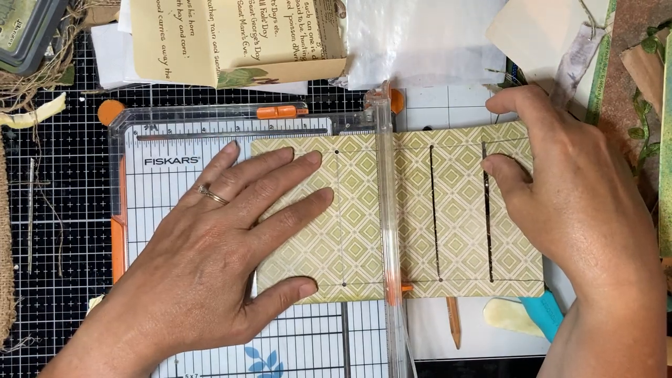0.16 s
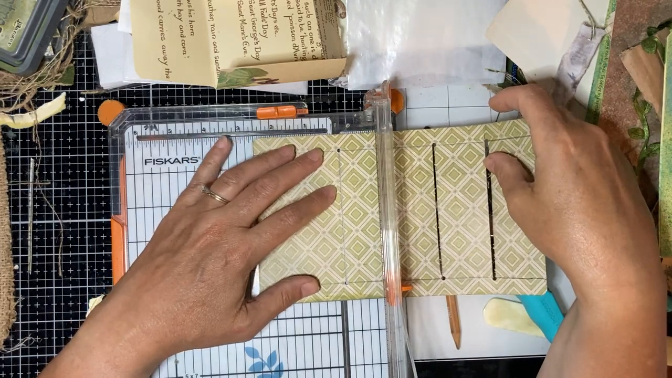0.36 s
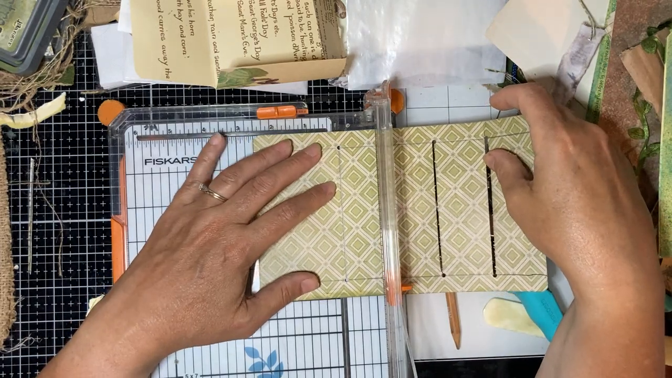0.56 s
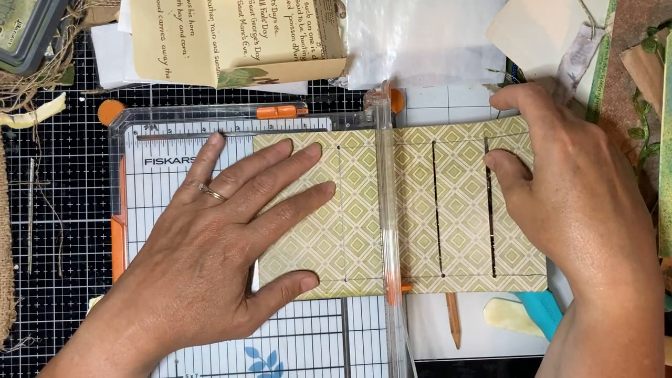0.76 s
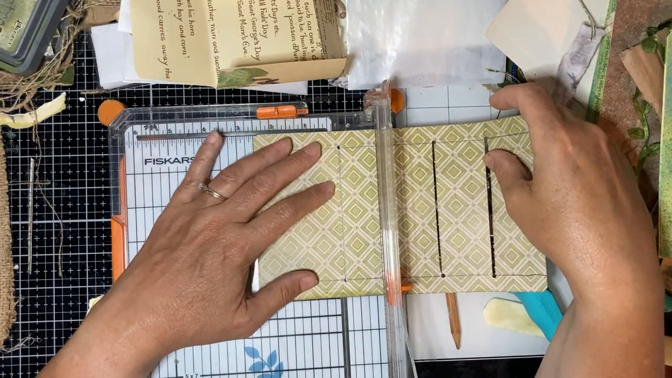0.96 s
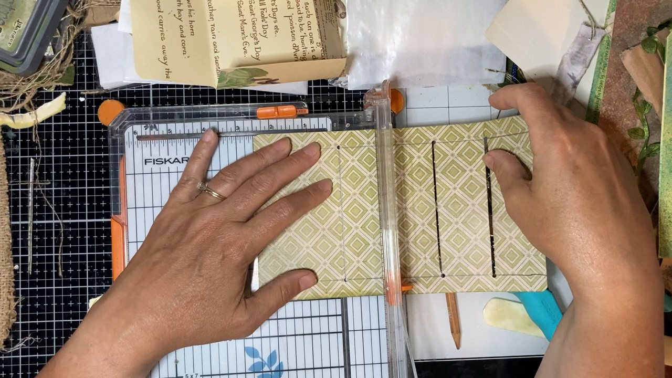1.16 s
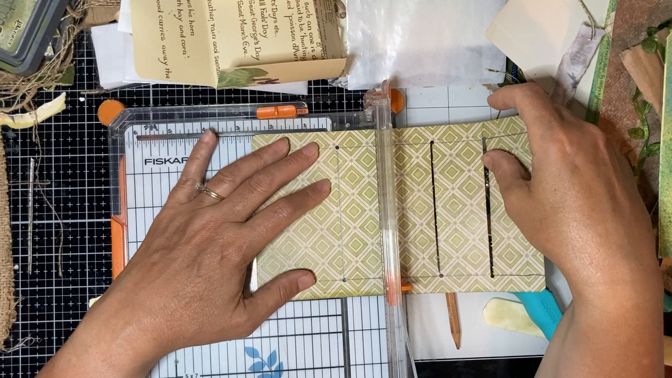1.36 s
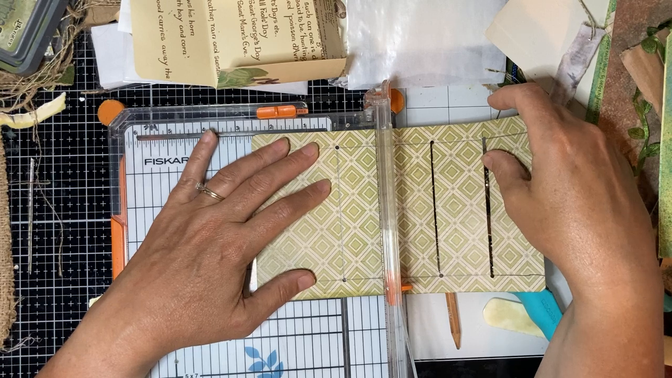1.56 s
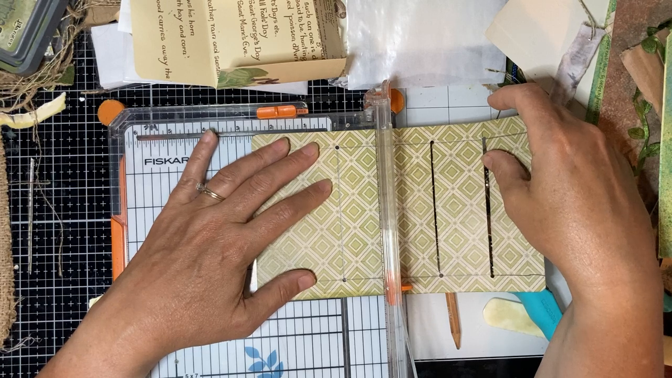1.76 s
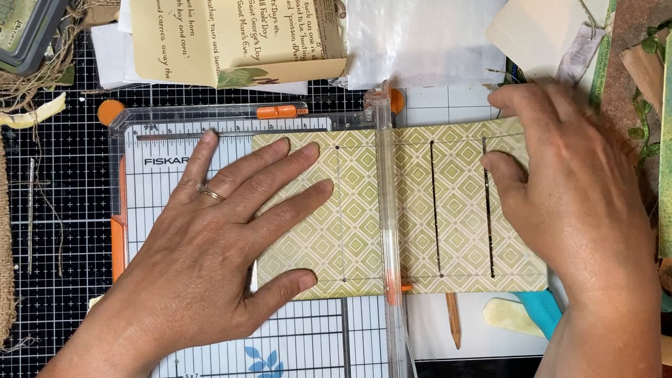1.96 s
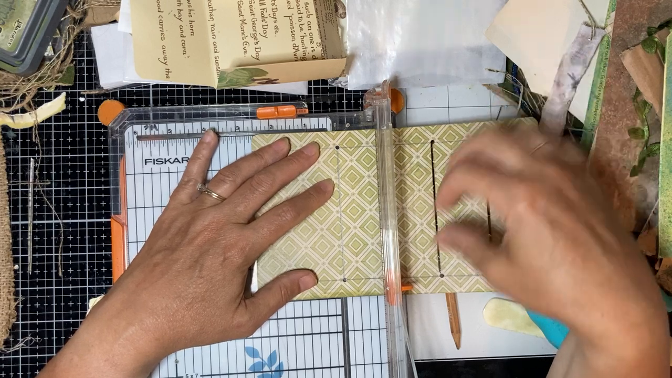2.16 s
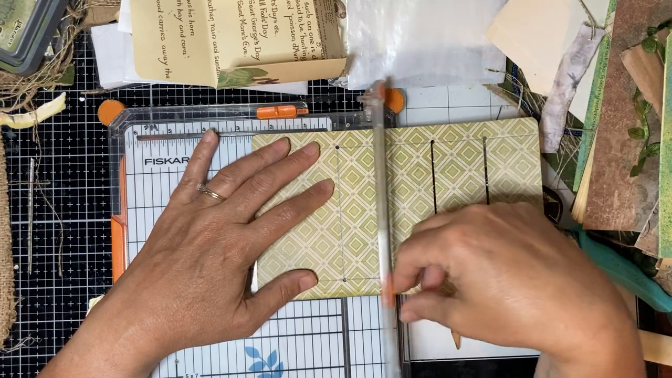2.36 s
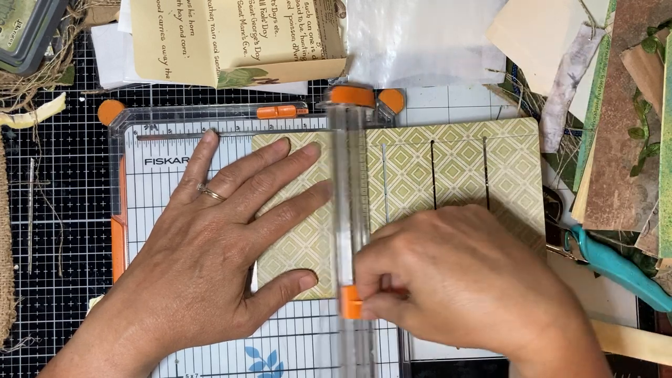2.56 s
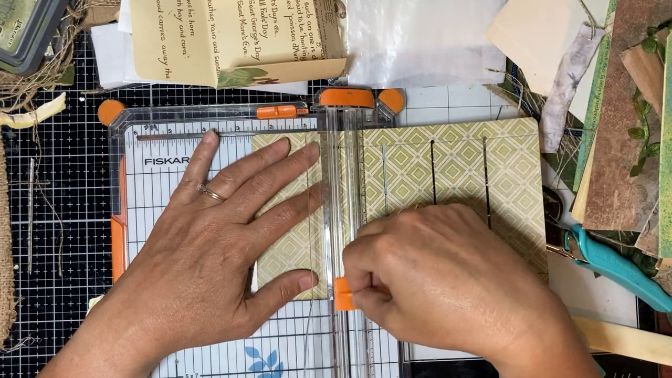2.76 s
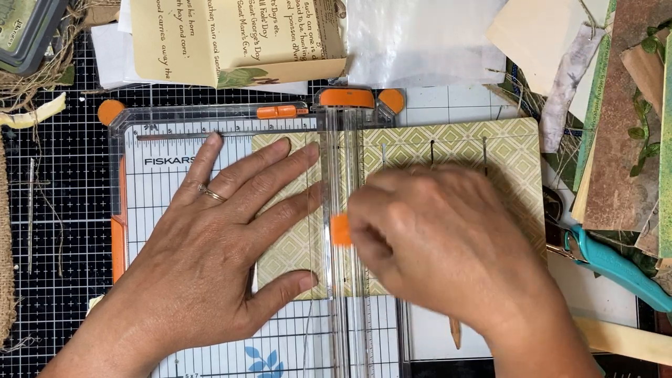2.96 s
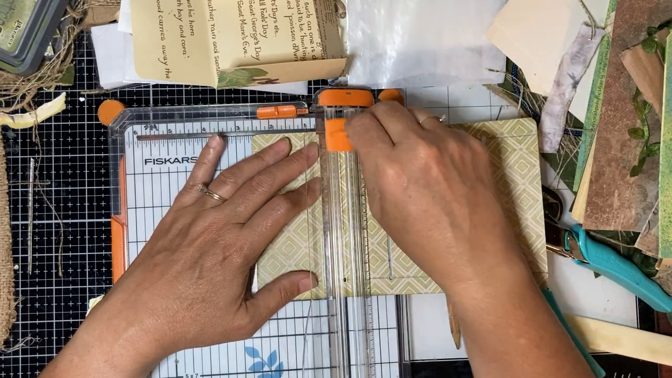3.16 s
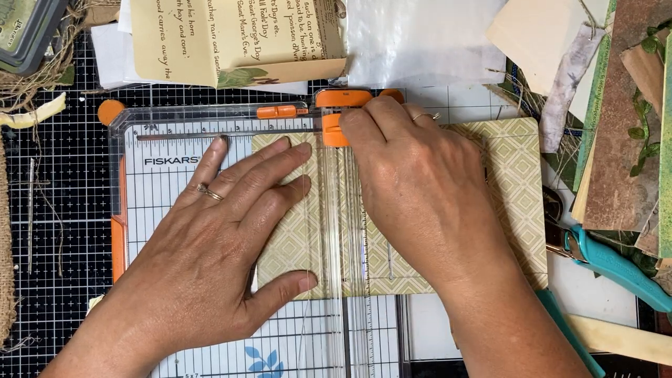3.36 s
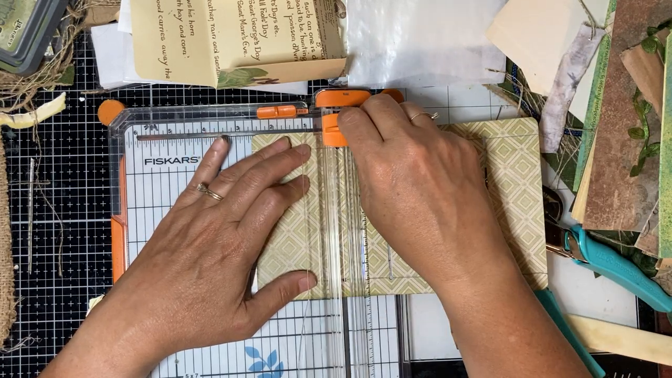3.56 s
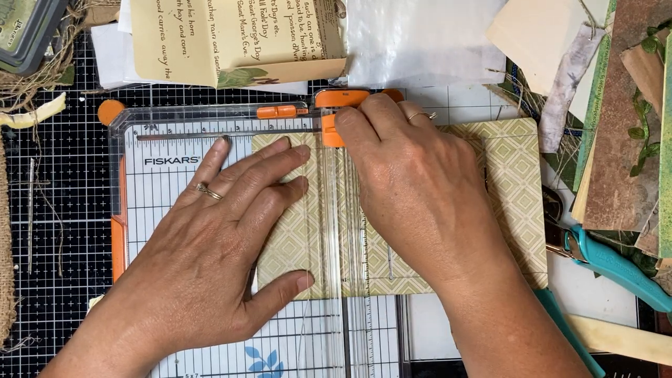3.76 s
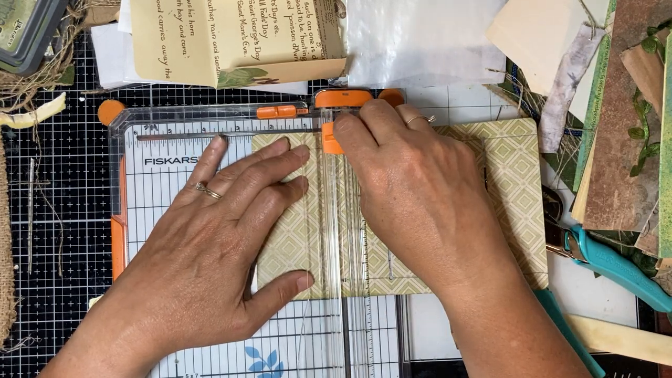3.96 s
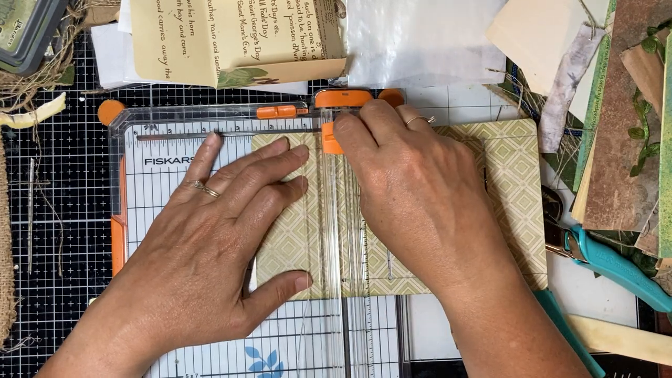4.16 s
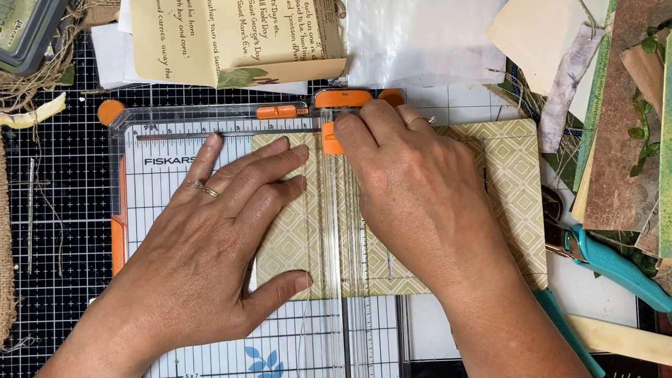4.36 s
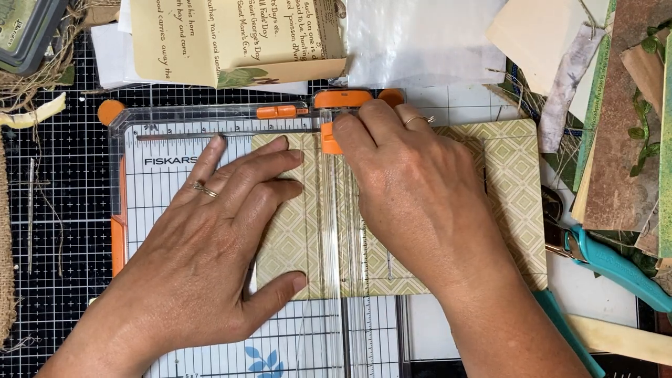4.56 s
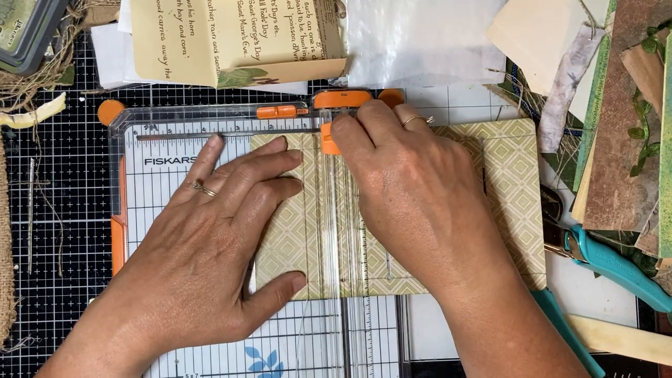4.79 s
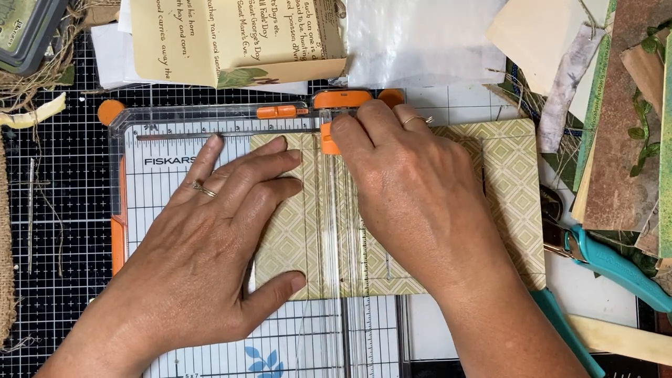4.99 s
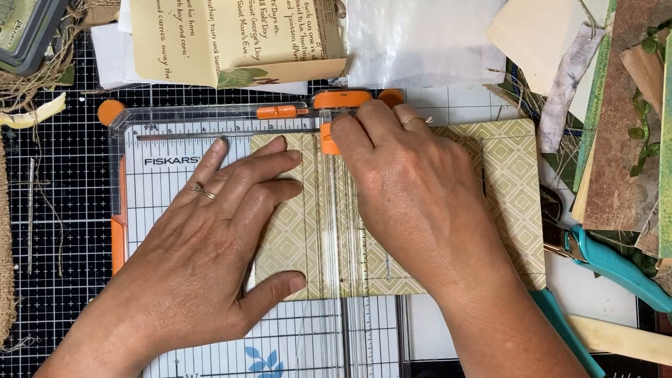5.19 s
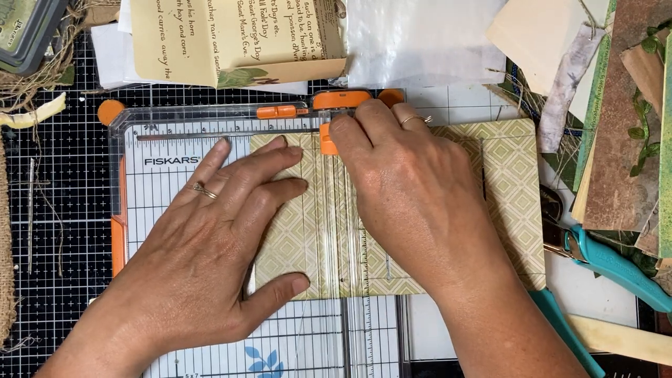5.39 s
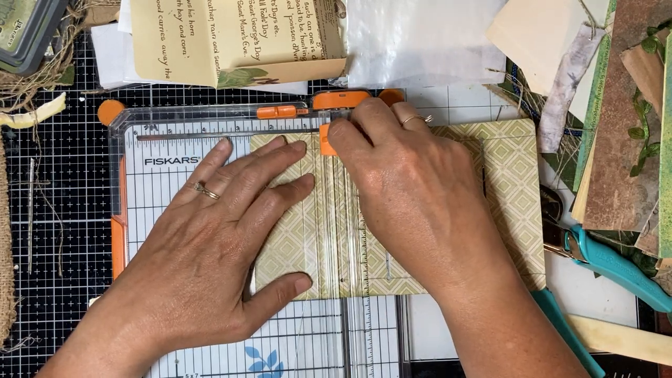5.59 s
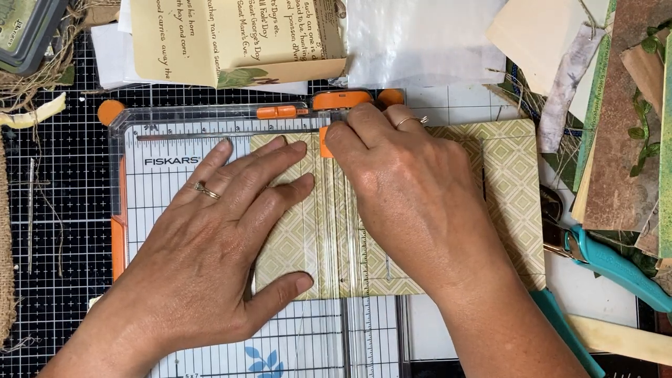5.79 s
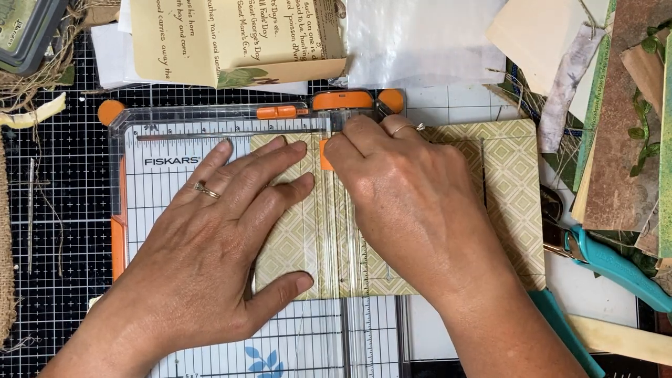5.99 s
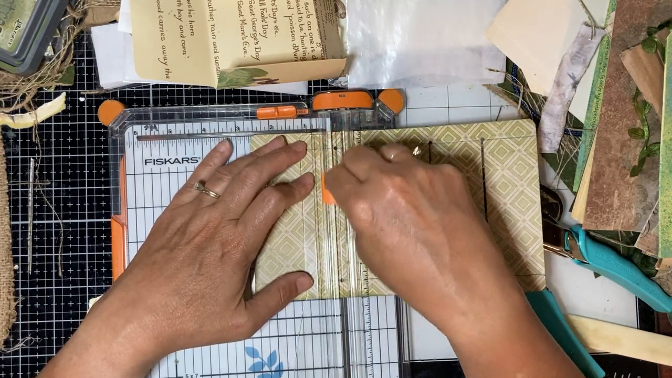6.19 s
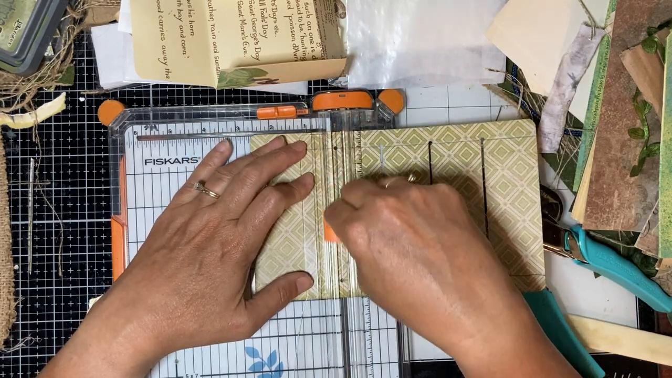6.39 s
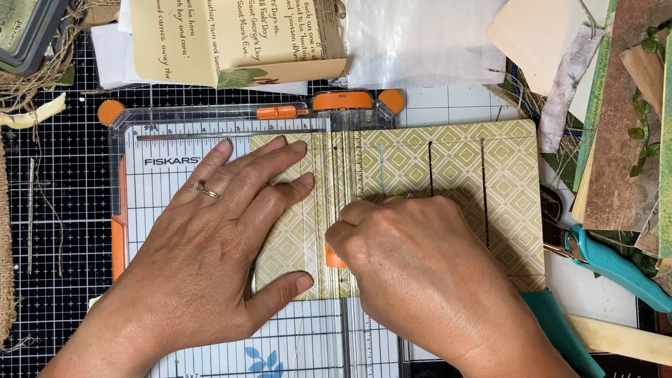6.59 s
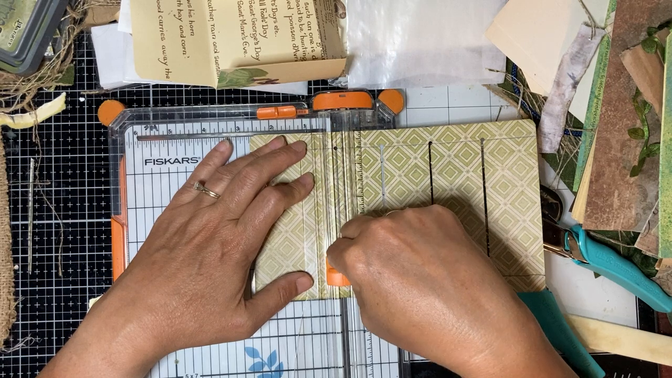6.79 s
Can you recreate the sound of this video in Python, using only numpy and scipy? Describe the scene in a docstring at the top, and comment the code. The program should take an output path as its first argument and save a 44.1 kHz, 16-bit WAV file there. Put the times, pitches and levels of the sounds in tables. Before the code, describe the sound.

In a quiet room, a plastic paper trimmer clacks, squeaks sharply as its carriage slides up, then rasps through card.

```python
"""A small room with a low hum: a plastic paper trimmer on a desk, close under a camera's two microphone ports.
Fingers shift a card in noise swishes, the rail clacks down in noise bursts that ring its modes,
and the blade carriage squeaks in stick-slip tones as it is pushed up the rail.
The blade is pressed in with small knocks, then drawn back through the card in one rasping cut of tiny slips."""
import sys
import numpy as np
from scipy import signal
from scipy.fft import rfft, irfft, next_fast_len
from scipy.io import wavfile
from scipy.ndimage import uniform_filter1d, map_coordinates

SR = 44100
rng = np.random.default_rng(int(sys.argv[2]) if len(sys.argv) > 2 else 0)


def transcribe(signal):
    """Save signal, clipped to [-1, 1], as a 16-bit WAV file at the path in sys.argv[1]."""
    frames = np.atleast_2d(signal).T
    limited = np.clip(frames, -1, 1)
    pcm = np.round(limited * 32767).astype(np.int16)
    wavfile.write(sys.argv[1], SR, pcm)


N = 301644
TIME = np.arange(N) / SR  # s
SIZE = 2 * next_fast_len(N // 2 + SR // 4)  # padded transform length, samples
HZ = np.fft.rfftfreq(SIZE, 1 / SR)
TOP_HZ = 15830  # the camera's band limit


def amp(db):
    """Decibels to gain."""
    return 10 ** (np.asarray(db) / 20)


def unit(x):
    """Scale to rms 1."""
    return x / np.sqrt(np.mean(x ** 2) + 1e-20)


def along(points, hz=HZ):
    """(Hz, value) points read on a log frequency axis."""
    f, v = np.transpose(points)
    return np.interp(np.log(hz + 1), np.log(f + 1), v)


def curves(rows):
    """A gate that opens at the first row and closes just after the last, then each column per sample."""
    s, *columns = np.transpose(rows)
    opening = np.clip((TIME - s[0]) / 0.0047, 0, 1)
    closing = np.clip((s[-1] - TIME) / 0.034 + 2, 0, 1)
    return [opening * closing] + [np.interp(TIME, s, column) for column in columns]


def wobble(rate):
    """A smooth random curve, rate knots a second."""
    knots = rng.standard_normal(int(N * rate / SR) + 4)
    return map_coordinates(knots, [TIME * rate])


def filtered(x, response):
    """x through a frequency response."""
    return irfft(rfft(x, SIZE) * response, SIZE)[..., :N]


def causal(gain):
    """The minimum-phase response with this gain, by folding the cepstrum."""
    cepstrum = irfft(np.log(np.maximum(gain, 1e-6)))
    cepstrum[1:SIZE // 2] *= 2
    cepstrum[SIZE // 2 + 1:] = 0
    return np.exp(rfft(cepstrum))


def band(x, hz, octaves):
    """One band of x around hz, rms 1."""
    edge = 2 ** (octaves / 2)
    limits = [hz / edge, min(hz * edge, TOP_HZ)]
    return unit(signal.sosfilt(signal.butter(2, limits, "bandpass", fs=SR, output="sos"), x))


def grains(rate, spread_db):
    """Tiny slips and fibre snaps of uneven size, rate a second on average, rms 1."""
    moments = rng.random(N) < rate / SR
    sizes = rng.standard_normal(N) * amp(spread_db * rng.standard_normal(N))
    return unit(moments * sizes)


def patchy(x, depth_db):
    """The colour drifts in narrow patches as the points of contact change."""
    z = signal.stft(x, nperseg=512)[2]
    field = uniform_filter1d(rng.standard_normal(z.shape), size=3, axis=0)
    field = uniform_filter1d(field, size=16, axis=1)
    return signal.istft(z * unit(amp(depth_db * unit(field))), nperseg=512)[1][:N]


SWELL_DB, SWELL_SHAPE = 19.5, 1.57  # fall at the ends of the rise and fall; roundness of the top


def swell(s, rise, fall):
    """Level in dB of a movement that gathers, peaks at s and eases off."""
    distance = np.maximum((s - TIME) / rise, (TIME - s) / fall)
    return -SWELL_DB * np.clip(distance, 0, 10) ** SWELL_SHAPE


def struck(s, attack, t60):
    """Gain of something struck at s: a quick rise and a steady decay."""
    age = np.maximum(TIME - s, 0)
    return (1 - np.exp(-age / attack)) * amp(-60 * np.minimum(age / t60, 4))


TOP_DB, TOP_GROWS = -6, 0.32  # treble under the middle register; dB more per dB of brightness


def shades(db, bright_db):
    """Low, middle and high levels: a brighter touch has less knock and more treble."""
    return db - bright_db, db, db + TOP_DB + TOP_GROWS * bright_db


# the two microphone ports, lead of the left over the right: f/Hz, phase/rad
PORT_LEAD = [(100, 0), (700, .9), (1500, 0), (3100, 1.4), (4500, 1.9), (5500, 2.6), (6800, .1),
             (9100, -3.14), (11300, -6.28), (13500, -9.42), (15600, -12.5)]
# left minus right at the ports: f/Hz, level/dB
PORT_TILT = [(100, -0.5), (300, 0), (550, 3), (1000, 3.5), (2000, 1), (4000, 2), (12000, -1)]


def ports():
    """Left and right responses to a sound from the desk: opposite halves of the level and phase gap."""
    half = amp(along(PORT_TILT) / 2) * np.exp(.5j * along(PORT_LEAD))
    return np.array([half, 1 / half])


# ringing of trimmer base and rail over the broad response:
# f/Hz, width/Hz, level/dB with the carriage at the far end, level/dB at the near end
TRIMMER_MODES = [(345.5, 40.9, 6.5, 5.5), (582, 170, 9.5, 15.5), (678, 70, 10.5, -3.5),
                 (790, 130, 4.5, 1.5), (1120, 60, 11, 4), (1215, 130, -4.5, 13), (1550, 110, 9.5, -0.5),
                 (1740, 120, -9, 15), (1979, 210, 8.5, 15), (2252, 110, 6, 2.5), (2730, 220, 3, 6.5),
                 (3445, 220, 1.5, 5.5), (4200, 220, -4, 5.5), (4770, 260, 2, 4)]
# edges between the low, middle and high registers: f/Hz
REGISTER_EDGES = (1000, 6000)


def registers(spectrum, nearness, coupling=1):
    """Low, middle and high stereo responses, each of unit power; coupling is how strongly the trimmer rings."""
    peaks = 0
    for hz, width, far_db, near_db in TRIMMER_MODES:
        peak_db = far_db + nearness * (near_db - far_db)
        peaks = peaks + peak_db / (1 + (2 * (HZ - hz) / width) ** 2)
    body = amp(along(spectrum) + coupling * peaks)
    low, below_top = (1 / (1 + (HZ / hz) ** 12) for hz in REGISTER_EDGES)
    shares = (low, (1 - low) * below_top, 1 - below_top)
    pair = ports()
    parts = [causal(body * np.sqrt(share)) * pair for share in shares]
    return [part / np.sqrt(np.mean(np.abs(part.mean(0)) ** 2)) for part in parts]


# likeness of steady noise at the two ports: f/Hz, likeness/-1 to 1
PORT_LIKENESS = [(60, 0.93), (130, 0.9), (290, 0.74), (640, 0.35), (1400, .15), (6200, .1), (8400, .8),
                 (15000, .85)]


def rush(spectrum):
    """Steady stereo noise, more or less alike at the ports by frequency, rms 1."""
    turn = np.arccos(np.clip(along(PORT_LIKENESS), -1, 1)) / 2
    mix = np.array([np.cos(turn), np.sin(turn)])
    mid, side = filtered(rng.standard_normal((2, N)), amp(along(spectrum)) * mix)
    return unit(np.array([mid + side, mid - side]))


# low rumble, relative spectrum: f/Hz, level/dB
RUMBLE = [(12, -69.5), (20, -32.5), (38, -14.5), (60, 0), (71, -17.5), (81, -8), (109, -7.5), (201, -22),
          (239, -17.5), (264, -27.5), (400, -35), (520, -68), (880, -120)]
# faint hiss, relative spectrum: f/Hz, level/dB
HISS = [(150, -2), (300, -8.5), (600, -0.5), (1000, -6.5), (2000, -13.5), (4000, -17.5), (8000, -17.5),
        (13000, -19.5), (15000, -27), (16000, -36.5)]
# hum tones, mean level before a slight waver: f/Hz, level/dB
HUM_TONES = [(59, -54.5), (102.3, -68), (120, -68.5)]
# a faint 335 Hz tone dying away: t/s, level/dB
FADING_DRONE = [(0, -75.5), (0.9, -71), (1.25, -76.5), (1.5, -98), (1.7, -120)]


def background():
    """Low rumble, a wavering hum of sines, a fading drone and faint steady hiss."""
    hum = 0
    for hz, db in HUM_TONES:
        tone = unit(np.sin(2 * np.pi * hz * TIME + 0.6 * wobble(3.9)))
        hum = hum + amp(db + 0.5 * wobble(8.5)) * tone
    gate, drone_db = curves(FADING_DRONE)
    drone = gate * amp(drone_db) * np.sin(2 * np.pi * 335 * TIME + 0.3 * wobble(6.7))
    rumble = amp(-56.5) * rush(RUMBLE)
    hiss = amp(-79.0) * filtered(rush(HISS), ports())
    return hum + drone + rumble + hiss


# decay of the room: f/Hz, t60/s
ROOM_DECAY = [(150, 0.21), (1000, 0.26), (5000, 0.22), (14000, 0.08)]


def room(x):
    """A short diffuse answer from the desk and walls: decaying noise, different at each port."""
    hz, t, z = signal.stft(rng.standard_normal((2, SR // 2)), SR, nperseg=256)
    decay = amp(-60 * t / along(ROOM_DECAY, hz)[:, None])
    tail = signal.istft(z * decay, SR, nperseg=256)[1]
    tail = np.pad(tail / np.linalg.norm(tail[0]), ((0, 0), (SR // 250, 0)))  # starts 4 ms late
    return signal.fftconvolve(x, tail, axes=1)[:, :N]


def clutter(x):
    """Things on the desk scatter the middle frequencies back within milliseconds, differently to each port."""
    t = np.arange(SR // 40) / SR
    copies = rng.standard_normal((2, len(t))) * t * np.exp(-t / 0.0013)
    response = rfft(copies / np.linalg.norm(copies[0]), SIZE)
    around_3_khz = np.exp(-np.log((HZ + 1) / 3000) ** 2)
    return filtered(x, response * around_3_khz)


# part of a sliding sound that arrives scattered: f/Hz, share/0-1
SCATTERED_SHARE = [(200, .03), (600, .1), (1000, .22), (1800, .18), (2600, .5), (4000, .5), (5800, .68),
                   (7000, .25), (9000, .06), (12000, .12)]


def scattered(x):
    """Moving hands and card scatter part of a sliding sound along ever-changing paths to each port."""
    share = np.clip(along(SCATTERED_SHARE), 0, 1)
    z = signal.stft(filtered(x, np.sqrt(share)), nperseg=128)[2]
    real, imag = uniform_filter1d(rng.standard_normal((2, *z.shape)), size=16, axis=-1)
    turned = z * np.exp(1j * np.arctan2(imag, real))  # slowly changing random phase
    paths = signal.istft(turned, nperseg=128)[1][:, :N]
    return filtered(x, np.sqrt(1 - share)) + np.sqrt(2) * paths


# broad response to the sliding carriage, shared by fingers and blade catches: f/Hz, level/dB per Hz
SLIDE_RESPONSE = [(60, -3), (200, 1.5), (420, -1.5), (800, -8.5), (1400, -12.5), (2600, -14.5), (3800, -11),
                  (4600, -12), (6000, -15), (8500, -14), (11000, -13.5), (13500, -18.5), (16000, -23.5)]


def fidgets():
    """The resting fingers keep making faint, dull shuffles on the card: grains in slow random swells."""
    shuffle = amp(5 * np.minimum(wobble(22), 2) - 85) * grains(3000, spread_db=2)
    low, middle, _ = registers(SLIDE_RESPONSE, 0, coupling=0.35)
    return filtered(shuffle, low + amp(-4.5) * middle)


# broad response of the rubbed card: f/Hz, level/dB per Hz
CARD_RESPONSE = [(150, 16), (1200, -9), (1800, 0.5), (2700, -10), (5000, -6), (7000, -8), (10000, -4),
                 (13000, -3.5), (16000, -13.5)]
# fingers and card rubbing: t/s at the loudest, rise/s, rasp level/dB, hiss level/dB
CARD_RUBS = [(0.454, 0.079, -77, -71.5), (0.614, 0.026, -99, -70), (0.85, 0.04, -99, -76.5),
             (0.969, 0.059, -99, -74.5), (1.039, 0.014, -81, -75.5), (1.996, 0.054, -58.5, -58),
             (2.133, 0.0067, -99, -74.5), (4.108, 0.051, -77, -90.5), (4.449, 0.062, -71.5, -73.5),
             (5.248, 0.04, -66, -61)]
RUB_FALL = .8  # fall time over rise time


def rubs():
    """Skin and card slide in short dry swishes that also stir the trimmer's base."""
    rasp, hiss = 0, 0
    for s, rise, rasp_db, hiss_db in CARD_RUBS:
        shape = amp(swell(s, rise, RUB_FALL * rise))
        rasp = rasp + amp(rasp_db) * shape
        hiss = hiss + amp(hiss_db) * shape
    out = 0
    for gain, response in zip((amp(-6.0) * rasp, rasp, hiss), registers(CARD_RESPONSE, 0.39, coupling=0.1)):
        grit = patchy(grains(2000, spread_db=3.5), depth_db=5.5)
        out = out + filtered(gain * grit, response)
    return out


# brief scuffs of fingers, card and carriage: t/s at the loudest, rise and fall/s, centre f/Hz, level/dB
COLOURED_SCUFFS = [(0.992, 0.054, 880, -75), (1.57, 0.022, 950, -77), (2.007, 0.027, 1970, -51.5),
                   (2.878, 0.014, 1180, -57.5), (3.04, 0.02, 1180, -58), (3.093, 0.0139, 1015, -55.5),
                   (3.114, .025, 663, -59), (3.15, .017, 1980, -55), (4.1, 0.073, 660, -68.5),
                   (5.705, 0.04, 1990, -65.5), (5.845, 0.031, 1950, -60), (6.075, 0.066, 1760, -54)]


def scuffs():
    """Each scuff is a swell of grit in one band, set by where it touches."""
    grit = grains(3200, spread_db=-2.0)
    out = 0
    for s, span, hz, db in COLOURED_SCUFFS:
        out = out + band(grit, hz, octaves=.8) * amp(db + swell(s, span, span))
    return filtered(out, ports())


# the trimmer's base rocking against the desk under the hand: t/s, level/dB
BASE_KNOCKS = [(2.133, -50.5), (3.914, -57.5), (4.152, -60), (4.192, -57), (5.228, -41.5), (5.286, -37.5),
               (5.303, -47.5)]
# what the base rings with, relative to the knock: f/Hz, level/dB, t60/s
BASE_RINGS = [(404, -9, .055), (470, -3, .055), (680, 0, .06), (850, -10, .04)]


def rocking():
    """The base knocks softly on the desk: a short, dull, hollow thud of decaying sines."""
    rings = 0
    for s, db in BASE_KNOCKS:
        for hz, mode_db, t60 in BASE_RINGS:
            tone = np.sin(2 * np.pi * hz * TIME + .5 * wobble(150))
            rings = rings + amp(db + mode_db) * struck(s, .005, t60) * tone
    return filtered(rings, ports())


# the desk giving under the harder pushes: t/s, f/Hz, level/dB
DESK_THUMPS = [(2.634, 118.5, -35), (5.242, 143, -47), (5.871, 320, -38), (5.872, 157, -37.5),
               (6.787, 111, -36)]


def thumps():
    """A few low cycles of the desk top: decaying sines."""
    out = 0
    for s, hz, db in DESK_THUMPS:
        out = out + amp(db) * struck(s, 0.002, 0.09) * np.sin(2 * np.pi * hz * (TIME - s))
    return out


# sharp ticks of a card edge or the blade: t/s, centre f/Hz, level/dB
EDGE_TICKS = [(1.039, 1600, -63.5), (2.011, 4700, -52), (2.027, 7000, -52), (2.13, 1270, -59.5),
              (3.089, 1007, -48), (3.142, 1970, -44), (5.254, 5150, -51.5), (5.532, 4300, -47),
              (5.704, 3650, -56.5), (5.72, 3620, -58), (5.869, 1630, -40.5)]
CONTACT_ATTACK_S = .0009  # ticks and clacks alike


def ticks():
    """Each tick is a sudden burst of noise in one band that dies within milliseconds."""
    noise = rng.standard_normal(N)
    out = 0
    for s, hz, db in EDGE_TICKS:
        out = out + amp(db) * struck(s, CONTACT_ATTACK_S, t60=.024) * band(noise, hz, octaves=.9)
    return filtered(out, ports())


def strikes(blows, responses, lives):
    """Each blow (s, low, middle, high dB) is a sharp crack and a short rattle; lives are the rattles' t60 in s."""
    t = np.arange(SR // 5) / SR
    out = 0
    for column, (response, t60) in enumerate(zip(responses, lives)):
        force = np.zeros(N + SR)
        rattle, crack = amp(-60 * t / t60), 0.78 * amp(-60 * t / 0.0026)
        shape = (rattle + crack) * (1 - np.exp(-t / CONTACT_ATTACK_S))
        for s, *levels_db in blows:
            burst = shape * rng.standard_normal(len(t))
            burst *= np.sqrt(0.0066 * SR) / np.linalg.norm(burst)  # the energy of 6.6 ms at rms 1
            force[round(s * SR):][:len(t)] += amp(levels_db[column]) * burst
        out = out + filtered(force[:N], response)
    return out


# broad response to a blow: f/Hz, level/dB per Hz
BLOW_RESPONSE = [(60, -7.5), (200, 7), (400, -2.5), (950, -3), (1400, -7), (2600, -10.5), (3400, -7),
                 (4300, -4), (6000, -13.5), (8500, -10.5), (11000, -14), (16000, -22.5)]
# plastic parts touching: t/s, clack level/dB, brightness/dB of the clack over the low knock
PLASTIC_CONTACTS = [(0.902, -66, -13.5), (1.874, -84, -19.5), (1.991, -53.5, 10), (2.01, -59, -3.5),
                    (2.13, -80, -25.5), (2.343, -63, -12), (2.428, -69.5, -13), (2.509, -53, 8),
                    (2.534, -57.5, 12.5), (2.563, -68, 17), (2.625, -62.5, 9), (2.635, -53.5, 25.5),
                    (2.635, -39.5, 2.5), (2.651, -40.5, 5.5), (2.665, -54, 14), (2.69, -58.5, 5.5),
                    (2.703, -55, 22), (2.767, -66, -5.5), (3.165, -58, 13), (3.252, -66.5, -7.5),
                    (3.314, -56, 0), (3.331, -56, -4.5), (3.604, -67.5, -5), (4.019, -76.5, 31),
                    (4.415, -64.5, -13), (5.226, -67, -17), (5.252, -58, -6.5), (5.532, -66, 18),
                    (5.682, -65.5, 12), (5.775, -64.5, -11.5), (5.868, -68.5, -9)]


def contacts():
    """Plastic parts clack together and ring the rail; the highs die first."""
    blows = [(s, *shades(db, bright_db)) for s, db, bright_db in PLASTIC_CONTACTS]
    return strikes(blows, registers(BLOW_RESPONSE, 0.08, coupling=0.67), lives=(.08, .045, .025))


# the blade catching in the card late in the cut: t/s, clack level/dB
BLADE_CATCHES = [(6.412, -44), (6.456, -49), (6.475, -46.5), (6.49, -47), (6.512, -43.5), (6.558, -45.5),
                 (6.593, -44.5), (6.645, -46), (6.73, -54), (6.779, -45)]
CATCH_KNOCK_DB, CATCH_TICK_DB = -4, -12  # relative to the clack


def catches():
    """The blade catches and snaps free, ringing the near end of the rail."""
    blows = [(s, db + CATCH_KNOCK_DB, db, db + CATCH_TICK_DB) for s, db in BLADE_CATCHES]
    return strikes(blows, registers(SLIDE_RESPONSE, 1.0, coupling=1.0), lives=(.06, .02, .016))


# the carriage gripped, jolted and pressed in: start t/s, length/s, rasp level/dB, brightness/dB
SHORT_SCRAPES = [(2.353, 0.039, -74.5, -13.5), (2.434, 0.11, -69.5, -2.5), (2.868, 0.065, -74, 5),
                 (3.134, 0.012, -60, 3), (3.246, 0.033, -67.5, -5.5), (3.32, 0.026, -63, -4),
                 (5.482, 0.082, -73, -2.5), (5.583, 0.07, -76.5, -6), (5.674, 0.074, -67, -1.5),
                 (5.79, 0.034, -75, 7)]
SCRAPE_ATTACK_S, SCRAPE_T60_S = .007, .12


def scrapes():
    """Gains of body, rasp and hiss for the short scrapes: a quick attack, a hold and a release."""
    gains = 0
    for s, length, db, bright_db in SHORT_SCRAPES:
        attack = np.clip((TIME - s) / SCRAPE_ATTACK_S, 0, 1)
        release = amp(-60 * np.maximum(TIME - s - length, 0) / SCRAPE_T60_S)
        gains = gains + np.outer(amp(shades(db, bright_db)), attack * release)
    return gains


def driven(effort_db, law):
    """Gains of body, rasp and hiss, each growing with effort at its own rate."""
    return np.array([amp(db + grows * effort_db) for db, grows in law])


# carriage on the rail: t/s, place/0 far end - 1 near end
CARRIAGE_PLACE = [(2.7, 0.5), (3.2, 0.11), (5.95, 0.05), (6.1, .2), (6.3, 0.3), (6.47, 0.98), (6.75, 0.92)]
# one row each for body, rasp and hiss: slips/per s, share of the judder/ratio, patchiness/dB
STROKE_GRAIN = [(3000, 1.3, 1), (4500, .7, 1.1), (5000, .7, 2.2)]


def stroke(gains, ends, judder_db, snag_db):
    """The carriage drags in uneven slips and snags; its place on the rail shifts the modes and an echo."""
    nearness = np.clip(curves(CARRIAGE_PLACE)[1], 0, 1)
    snags = (wobble(260) > 2) * snag_db  # rare catches of a few milliseconds
    judder = judder_db * (wobble(110) + .5 * wobble(35)) + snags
    echo_s = .0021 - 0.0011 * nearness
    out = 0
    for far, near, gain, (rate, share, patch_db) in zip(*ends, gains, STROKE_GRAIN):
        slips = patchy(grains(rate, spread_db=-1), patch_db) * amp(share * judder)
        echo = np.interp(TIME - echo_s, TIME, slips)
        slips = unit(slips + 0.19 * echo) * gain
        out = out + filtered(slips * (1 - nearness), far) + filtered(slips * nearness, near)
    return out


# how hard the blade is drawn through the card, counted from its strongest: t/s, effort level/dB
CUT_EFFORT = [(5.81, -64), (5.87, -50), (5.902, -58), (5.98, -59.5), (6.062, -48.5), (6.236, -45),
              (6.42, -46.5), (6.53, -49.5), (6.82, -54.5)]
# body, rasp and hiss of the push: level/dB at full effort, growth/dB per dB of effort
PUSH_GROWTH = [(-60.5, 2.5), (-56.5, 2.5), (-50.5, 4)]
# body, rasp and hiss of the cut: level/dB at full effort, growth/dB per dB of effort
CUT_GROWTH = [(-46, 1.18), (-48.5, 0.93), (-54, 0.81)]
PUSH_S, PUSH_RISE_S, PUSH_FALL_S = 3.063, 0.55, 0.31  # the push is one swell


def carriage():
    """A light, chattering push up the rail and short scrapes, then the gritty cut back through the card's fibres."""
    ends = registers(SLIDE_RESPONSE, 0), registers(SLIDE_RESPONSE, 0.93)
    sliding = driven(swell(PUSH_S, PUSH_RISE_S, PUSH_FALL_S), PUSH_GROWTH) + scrapes()
    gate, effort_db = curves(CUT_EFFORT)
    cutting = gate * driven(effort_db - effort_db.max(), CUT_GROWTH)
    push = stroke(sliding, ends, judder_db=1.8, snag_db=4)
    cut = stroke(cutting, ends, judder_db=1.15, snag_db=1.5)
    return push + cut


def squeak(hz, gain, octave_gain, waver, rough, flutter_db):
    """A stick-slip tone and its octave, unsteady in pitch and strength."""
    unrest = np.minimum(1, np.sqrt(gain / amp(-41.5)))  # a weak tone is steadier
    phase = 2 * np.pi * np.cumsum(hz * (1 + waver * unrest * wobble(570))) / SR
    phase += rough * unrest * wobble(2200)
    tone = gain * np.sin(phase) + octave_gain * np.sin(2 * phase)
    return amp(flutter_db * wobble(220)) * tone


# the carriage sticking and slipping on a rail mode, one row a squeal:
# t/s at the loudest, rise and fall/s, f/Hz, level/dB, octave level/dB
RAIL_SQUEALS = [(2.905, 0.033, 6250, -39, -69.5), (2.971, 0.033, 6200, -35.5, -66),
                (2.993, 0.0096, 6207, -17.5, -14.5), (3.018, 0.017, 6260, -25, -27),
                (3.031, .018, 5980, -24.5, -39.5), (3.046, 0.011, 6133, -27.5, -47),
                (3.082, .09, 6350, -48.5, -65.5), (3.14, 0.041, 6115, -36, -59)]


def squeal():
    """The rail squeals in bursts, the strongest weighing most on the pitch; it reaches the right port first."""
    _, _, hz, db, octave_db = np.transpose(RAIL_SQUEALS)
    bursts = np.array([amp(swell(s, span, span)) for s, span, *_ in RAIL_SQUEALS])
    gain = amp(db) @ bursts
    octave_gain = amp(octave_db) @ bursts
    pitch = (hz * amp(db)) @ bursts / gain
    tone = squeak(pitch, gain, octave_gain, waver=.004, rough=.11, flutter_db=1.9)
    lag = np.exp(-1j * np.pi * HZ * .0001)  # half of a 0.1 ms gap between the ports
    return filtered(tone, np.array([lag, 1 / lag]))


# strands of the fading chirp: pitch/ratio to the sweep, level/dB relative to the tail
CHIRP_STRANDS = [(.959, -2), (1.005, 0), (1.052, -8), (1.101, 0)]
# the squeak sweeps up from the rail mode, then sinks back as the push slows
SWEEP_START_S, SWEEP_TOP_S, SWEEP_BEND, SETTLE_S = 2.985, 3.053, 2.1, .085
SWEEP_START_HZ, SWEEP_TOP_HZ, SETTLED_HZ = 6250, 8650, 7300
CHIRP_S, CHIRP_RISE_S, CHIRP_FALL_S, CHIRP_DB = 3.014, .028, .06, -30
OCTAVE_S, OCTAVE_RISE_S, OCTAVE_FALL_S, OCTAVE_DB = 3.006, 0.022, 0.031, -28.5
TAIL_S, TAIL_DB, TAIL_FADE_DB_PER_S = 3.05, -56.5, 55
STOP_S, STOP_FADE_DB_PER_S = 3.28, 60  # extra fade once the carriage stops


def chirp():
    """A rougher squeak sweeps up ever faster, then leaves strands that sink and fade."""
    climb = np.clip((TIME - SWEEP_START_S) / (SWEEP_TOP_S - SWEEP_START_S), 0, 1) ** SWEEP_BEND
    sink = 1 - np.exp(-(np.maximum(TIME - SWEEP_TOP_S, 0) / SETTLE_S) ** 2)
    hz = SWEEP_START_HZ + (SWEEP_TOP_HZ - SWEEP_START_HZ) * climb - (SWEEP_TOP_HZ - SETTLED_HZ) * sink
    gain = amp(CHIRP_DB + swell(CHIRP_S, CHIRP_RISE_S, CHIRP_FALL_S))
    octave_gain = amp(OCTAVE_DB + swell(OCTAVE_S, OCTAVE_RISE_S, OCTAVE_FALL_S))
    sweep = squeak(hz, gain, octave_gain, waver=.015, rough=.17, flutter_db=2)
    age = np.maximum(TIME - TAIL_S, 0)
    stop_fade_db = STOP_FADE_DB_PER_S * np.maximum(TIME - STOP_S, 0)
    tail = np.minimum(age / 0.026, 1) * amp(TAIL_DB - TAIL_FADE_DB_PER_S * age - stop_fade_db)
    strands = 0
    for ratio, db in CHIRP_STRANDS:
        strands = strands + squeak(ratio * hz, amp(db) * tail, 0, waver=.02, rough=.3, flutter_db=3)
    return filtered(sweep + strands, ports())


def scene():
    """The trimmer and hands on the desk, with the room's answer and background."""
    knocks = contacts() + catches() + ticks() + thumps()
    sliding = scattered(carriage() + rubs() + scuffs() + fidgets())
    desk = knocks + amp(-0.5) * clutter(knocks) + sliding
    squealing = squeal() + chirp()
    answer = amp(-12.0) * room(desk + amp(-4.0) * squealing)
    return background() + answer + rocking() + desk + squealing


def record(dry):
    """The camera keeps nothing above its band limit."""
    return filtered(dry, HZ < TOP_HZ)


dry = scene()
out = record(dry)
transcribe(out)
```